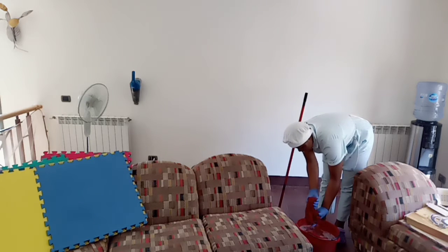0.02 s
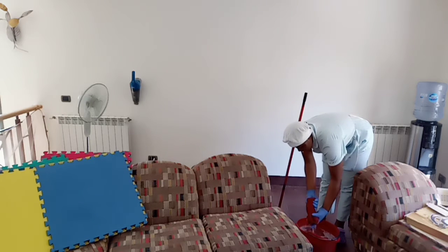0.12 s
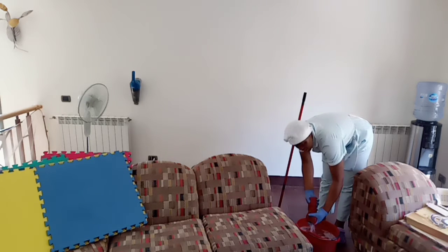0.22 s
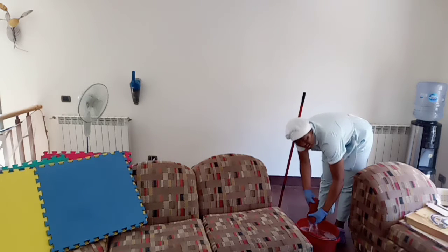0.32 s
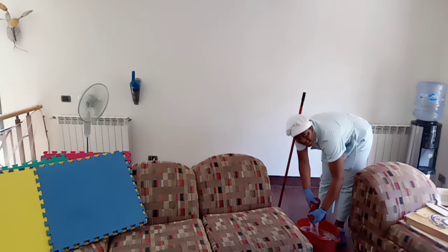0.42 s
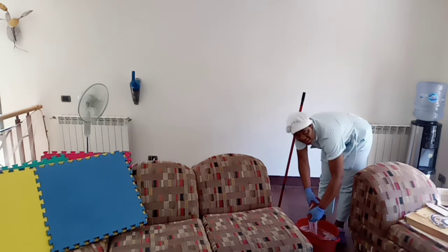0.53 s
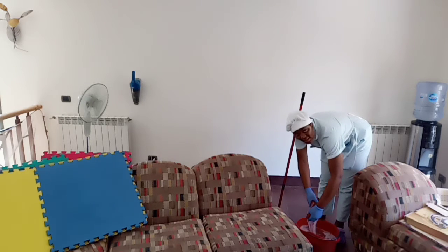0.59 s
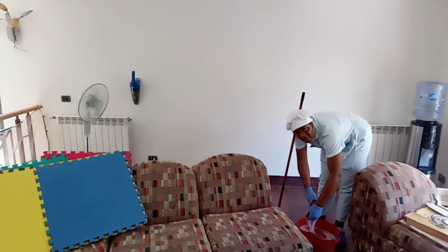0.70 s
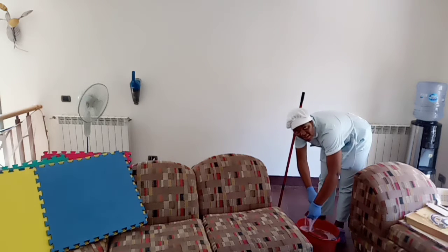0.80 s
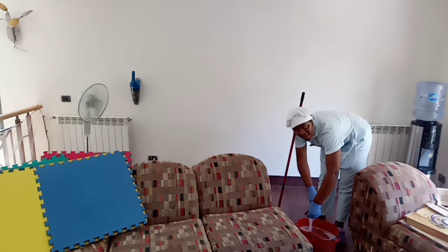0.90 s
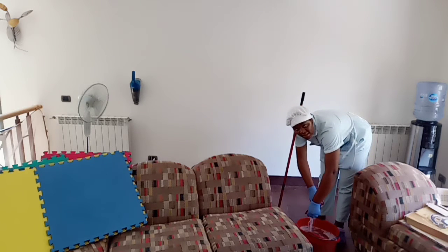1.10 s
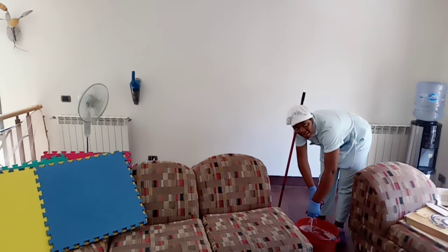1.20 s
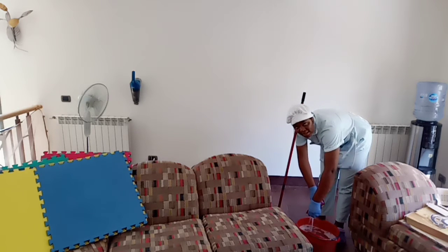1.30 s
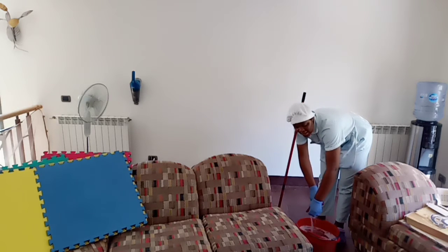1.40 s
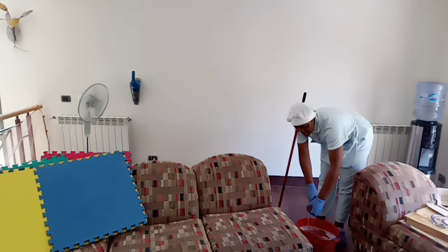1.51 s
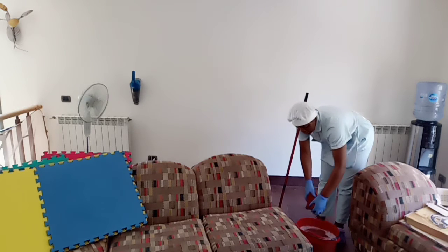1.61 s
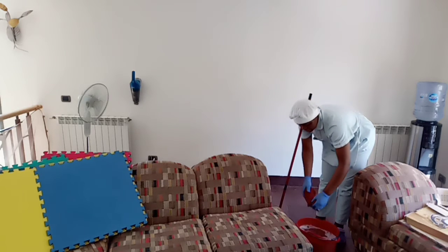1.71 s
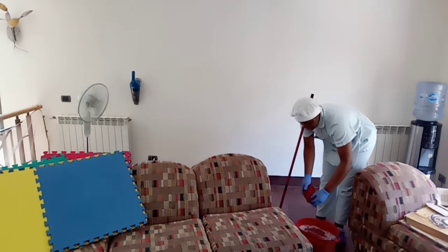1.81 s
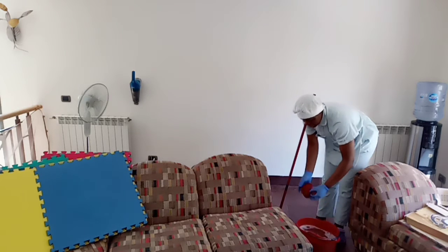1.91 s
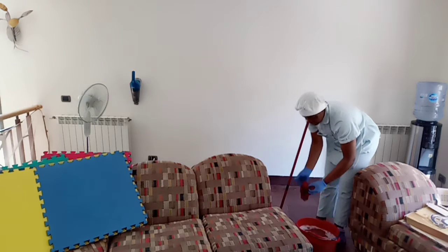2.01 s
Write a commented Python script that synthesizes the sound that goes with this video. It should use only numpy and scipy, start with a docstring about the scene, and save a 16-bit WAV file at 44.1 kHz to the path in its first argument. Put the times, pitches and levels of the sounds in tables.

```python
"""A quiet living room with a faint hum and a few small splats, then water trickles into a bucket.
A wet mop is wrung by hand over the plastic bucket, a few metres from the microphone. The trickle
swells and thins with the squeeze: crowds of tiny rings make drops, spray and squelch, larger rings
churn, and stirred air glugs and sounds hollow. Single bubbles plop as gliding sines; slops and
spits are bursts of filtered impacts. Random echoes give the room its short tail."""
import sys
import numpy as np
from scipy import signal
from scipy.io import wavfile
from scipy.ndimage import uniform_filter1d

SR = 44100
rng = np.random.default_rng(int(sys.argv[2]) if len(sys.argv) > 2 else 0)


def int16_out(signal):
    """Quantize to a 16-bit WAV file."""
    q = np.round(np.clip(np.atleast_2d(signal).T, -1, 1) * 32767)
    wavfile.write(sys.argv[1], SR, q.astype(np.int16))


N = 90405  # samples, about two seconds
T = np.arange(N) / SR


def amp(db):
    """Decibels to gain."""
    return 10 ** (np.asarray(db) / 20)


def evened(x):
    """Scales to unit rms."""
    return x / np.sqrt(np.mean(x ** 2) + 1e-20)


def curve(points):
    """Value over time, straight lines between (t/s, value) points."""
    return np.interp(T, *np.transpose(points))


def level(points):
    """Gain over time from (t/s, level/dB) points."""
    return amp(curve(points))


def read(points, hz):
    """Reads an (f/Hz, value) table on a log-frequency axis."""
    f, value = np.transpose(points)
    return np.interp(np.log(hz + 1), np.log(f + 1), value)


def add(mix, s, sound):
    """Mixes a sound in at a time in seconds, cut at the end of the mix."""
    part = mix[max(round(s * SR), 0):][:len(sound)]
    part += sound[:len(part)]


def colour(x, points, size=4096):
    """Causal minimum-phase filter with the given (f/Hz, level/dB) spectrum; unit rms out."""
    hz = abs(np.fft.fftfreq(size, 1 / SR))
    log_gain = np.log(amp(read(points, hz)))
    spectrum = np.exp(np.conj(signal.hilbert(log_gain)))
    taps = np.fft.ifft(spectrum).real[:size // 2]
    return evened(signal.fftconvolve(x, taps)[:len(x)])


def impacts(per_s, spread_db):
    """Random impacts of uneven size and either sign."""
    chance, size, sign = rng.random((3, N))
    strength = amp(spread_db * np.minimum(-np.log(size), 3.5))  # a few stand out, up to a ceiling
    return (chance < per_s / SR) * strength * np.sign(sign - .5)


def background():
    """Still air of the room as coloured noise, with a faint hum as one steady sine."""
    # Colour of the still air: f/Hz, level/dB
    air_colour = [(20, -36), (45, -11), (90, 3.5), (150, 1), (300, -6.5), (700, -14.5), (1500, -16),
                  (3000, -10), (5500, -33), (15000, -34)]
    air_db, hum_hz, hum_db = -65.5, 103, -77.5
    air = colour(rng.standard_normal(N), air_colour)
    hum = evened(np.sin(2 * np.pi * hum_hz * T))
    return amp(air_db) * air + amp(hum_db) * hum


def echoes(x, wet_db, early_db, size=20000):
    """Direct sound, close reflections and a tail that dies at its own speed in each band."""
    # Time for the tail to fall 60 dB: f/Hz, t/s
    tail_times = [(200, 0.27), (900, 0.32), (3000, 0.29), (8000, 0.14), (15000, 0.53)]
    taps = rng.choice([-1., 1.], size) * (rng.random(size) < .12)  # sparse echoes
    taps[:size // 100] = 0  # gap ahead of the tail
    hz, t, bands = signal.stft(taps, SR, nperseg=256)
    fall = amp(-60 * t / read(tail_times, hz)[:, None])
    tail = signal.istft(bands * fall, SR, nperseg=256)[1]
    response = amp(wet_db) * tail / np.linalg.norm(tail)
    early = rng.integers(40, 400, 8)  # delays in samples
    response[early] += amp(early_db) * rng.choice([-1., 1.], 8)
    response[0] += 1  # direct sound
    return signal.fftconvolve(x, response / np.linalg.norm(response))[:N]


def room(x, wet_db, early_db, count=6):
    """The water lands on a cycle of spots, each with its own path through the room."""
    spot_s = .04  # step from one spot to the next
    out = np.zeros(N)
    for k in range(count):
        away = (T / spot_s - k + 1) % count - 1  # steps from this spot's turn
        fade = np.cos(np.pi / 2 * np.minimum(abs(away), 1))
        out += echoes(x * fade, wet_db, early_db)
    return out


def stirred(hz, width_hz):
    """An air cavity kept ringing by a stream of small impacts; its pitch follows a curve."""
    turn = np.exp(2j * np.pi * np.cumsum(hz) / SR)
    smooth = signal.butter(2, width_hz / 2, fs=SR)
    swing = signal.lfilter(*smooth, impacts(per_s=500, spread_db=0) / turn)  # pitch shifted to zero
    return evened((turn * swing).real)


def fizz(low_hz, high_hz, per_s, cycles, spread_db, count=60):
    """A crowd of small bubbles, each a short rising ring with a soft start."""
    rise_per_cycle = 0.0097  # share of its pitch that a bubble gains as it surfaces
    out = np.zeros(N)
    for hz in np.geomspace(low_hz, high_hz, count):
        turns = hz * T[:SR // 16]
        age = turns / cycles
        swing = np.sin(2 * np.pi * turns * (1 + rise_per_cycle * turns / 2))
        ring = swing * age ** 2 * np.exp(-age ** 2 / 2)
        out += hz * signal.oaconvolve(impacts(per_s / count, spread_db), ring)[:N]
    return evened(out)


def hollow():
    """The bucket's hollow note: its air is stirred, its pitch moves with the mop in the mouth."""
    # Pitch of the note: t/s, f/Hz
    hollow_pitch = [(.45, 302), (.8, 331), (.96, 290)]
    # Strength of the note: t/s, level/dB
    hollow_level = [(.35, -73.5), (.45, -59.5), (.65, -72), (.8, -58), (.9, -69), (.96, -48.5),
                    (1.1, -56.5), (1.46, -62), (1.55, -76)]
    return stirred(curve(hollow_pitch), width_hz=65) * level(hollow_level)


def glug():
    """An air pocket under the stream glugs as a cavity of shifting pitch."""
    # Glugging of the pocket: t/s, f/Hz, level/dB
    glug_points = [(.3, 570, -76), (.55, 630, -57.5), (0.579, 630, -49), (.7, 555, -46.5),
                   (.76, 440, -52.5), (.81, 604, -47), (.9, 525, -61), (.94, 507, -51.5), (1.02, 515, -60),
                   (1.08, 530, -53), (1.4, 483, -71.5), (1.58, 506, -64), (1.65, 480, -54), (1.8, 477, -87)]
    s, hz, db = np.transpose(glug_points)
    return stirred(np.interp(T, s, hz), width_hz=150) * amp(np.interp(T, s, db))


def churn():
    """Larger bubbles ring in a crowd where the stream digs into the water."""
    # Strength of the churning: t/s, level/dB
    churn_level = [(0, -78), (.19, -61.5), (.26, -63.5), (.34, -54.5), (.5, -60), (.62, -52), (.75, -56.5),
                   (1, -48.5), (1.25, -51.5), (1.38, -63.5), (1.44, -58), (1.48, -65.5), (1.82, -67)]
    # Colour of the churning: f/Hz, level/dB
    churn_colour = [(250, -14.5), (380, -14), (500, 0.5), (620, 0.5), (730, -3.5), (860, 3.5), (1080, -1),
                    (1400, -5.5)]
    bubbles = fizz(392.4, 1360, per_s=1800, cycles=2.95, spread_db=1.5)
    return colour(bubbles, churn_colour) * level(churn_level)


def gurgle():
    """Churning bubbles, the glugging air pocket and the stirred air of the bucket."""
    return churn() + glug() + hollow()


def clump(db, hz, octaves, rise, decay):
    """A brief clump of impacts around one pitch, with a straight rise and exponential decay."""
    t = T[:SR // 5]
    # Steps of the given width from the centre, and dB below it
    skirts = ((-8, 60), (-4, 30), (-2, 16), (-1, 4), (0, 0), (1, 4), (2, 20), (4, 32), (8, 55))
    band = [(hz * 2 ** (k * octaves), -skirt) for k, skirt in skirts]
    burst = colour(impacts(per_s=6000, spread_db=1.5)[:len(t)], band)
    shape = np.minimum(t / rise, 1) * np.exp(-np.maximum(t - rise, 0) / decay)
    return amp(db) * burst * shape


def splashes():
    """Slops of water landing and bright spits of spray, each a clump of impacts."""
    # Slops: t/s, level/dB, centre f/Hz, width/octaves, rise/s, decay/s
    slops = [(.007, -53.5, 3230, 0.13, 0.0024, 0.0046), (0.054, -49, 3700, 0.35, 0.0037, 0.028),
             (.085, -49, 3420, 0.23, 0.0063, 0.015), (.355, -35, 3090, 0.17, 0.0054, 0.0079),
             (.814, -47, 980, 0.32, .009, 0.02), (0.9654, -36, 1030, 0.2, 0.00084, .015),
             (0.966, -36.5, 2830, 0.47, 0.0028, 0.019), (1.225, -36, 3400, 0.39, 0.011, 0.0069),
             (1.299, -34.5, 2590, 0.4, 0.0071, 0.013), (1.349, -40, 3240, 0.63, 0.0041, 0.012),
             (1.41, -46, 3380, 0.39, 0.0063, 0.022), (1.488, -48.5, 520, 0.56, 0.0035, 0.016),
             (1.609, -50, 3900, 0.15, 0.026, 0.056), (1.659, -49, 900, 0.17, 0.0083, 0.011),
             (1.711, -45.5, 920, 0.14, 0.0023, 0.018), (1.711, -41.5, 2530, 0.36, 0.0032, .011),
             (1.74, -46, 3800, 0.3, 0.013, 0.015), (1.862, -52, 2820, 0.75, 0.0046, 0.0056)]
    # Spits: t/s, centre f/Hz, level/dB
    spits = [(0.056, 8600, -53.5), (0.336, 9700, -46.5), (.70, 9800, -46), (0.784, 8400, -42.5),
             (0.928, 9600, -46.5), (0.967, 8900, -41.5), (1.047, 8700, -41.5), (1.07, 9450, -40),
             (1.109, 5200, -41), (1.213, 4700, -38), (1.419, 10400, -53), (1.729, 10400, -57)]
    out = np.zeros(N)
    for s, *slop in slops:
        add(out, s, clump(*slop))
    for s, hz, db in spits:
        add(out, s, clump(db, hz, octaves=.22, rise=.003, decay=.003))
    return out


def plops():
    """Each single bubble, large or small, swells as it pinches off, then rings out, wobbling
    in the stirred water."""
    # Single ringing bubbles: t/s, starting f/Hz, level/dB, swell/s, decay/s
    bubbles = [(.172, 524, -49.5, 0.016, 0.022), (.333, 1002, -39.5, 0.0015, 0.0043),
               (.634, 514, -39.5, .003, 0.011), (.6355, 3445, -17.5, 0.0017, 0.0021),
               (.819, 862, -27, .01, 0.0095), (.939, 3700, -32.5, .00084, 0.013),
               (.967, 1007, -28, 0.00081, 0.0062), (1.035, 2314, -26, 0.0023, 0.0012),
               (1.04, 3160, -25.5, 0.0024, .0015), (1.228, 2040, -38.5, 0.011, 0.013),
               (1.297, 2075, -37.5, .013, 0.031), (1.488, 550, -41, 0.0057, 0.0073),
               (1.659, 482.6, -42, 0.0124, 0.017), (1.661, 822, -36, 0.011, 0.0017),
               (1.7505, 3520, -29.5, 0.00098, 0.0009), (1.859, 1535, -50, 0.0074, 0.0032)]
    rise_per_s, wobble_share = 0.36, 0.034  # both as a share of the pitch
    out, t = np.zeros(N), T[:SR // 5]
    for s, hz, db, swell, decay in bubbles:
        onset = np.sin(np.pi / 2 * np.minimum(t / swell, 1)) ** 2
        shape = onset * np.exp(-np.maximum(t - swell, 0) / decay)
        wobble = evened(uniform_filter1d(rng.standard_normal(len(t)), size=200))
        pitch = hz * (1 + rise_per_s * t + wobble_share * wobble)
        turns = np.cumsum(pitch) / SR
        add(out, s, amp(db) * shape * np.sin(2 * np.pi * turns))
    return out


def drops():
    """Drops patter on the water and their tiny trapped bubbles ring."""
    # How hard the water runs: t/s, level/dB
    flow = [(0, -62.5), (.15, -61), (.19, -51), (.25, -56), (.31, -50), (.36, -46.5), (.48, -47.5),
            (.57, -40.5), (1.07, -41.5), (1.2, -42.5), (1.28, -50.5), (1.35, -41.5), (1.45, -50.5),
            (1.57, -54.5), (1.66, -51), (1.8, -55.5), (1.92, -66.5)]
    # Colour of the drops: f/Hz, level/dB
    drop_colour = [(1100, -11), (1600, -13.5), (2050, -11), (2500, 0.5), (2900, -4), (3400, -0.5),
                   (4100, -5), (4800, -16.5), (6000, 16), (9000, -51.5)]
    patter = fizz(1548, 4628, per_s=3200, cycles=3.83, spread_db=3.1)
    return colour(patter, drop_colour) * level(flow)


def spray():
    """Fine, sparkling spray of uneven strength: a dense crowd of the smallest, highest rings."""
    # Strength of the fine spray: t/s, level/dB
    spray_level = [(0, -64), (.15, -74.5), (.3, -63.5), (.35, -58.5), (.45, -59), (.57, -51.5), (1.06, -51),
                   (1.25, -53.5), (1.45, -59), (1.6, -57.5), (1.74, -62), (1.8, -68), (2.05, -75.5)]
    # Colour of the spray: f/Hz, level/dB
    spray_colour = [(2500, 16.5), (4800, -4.5), (6000, -1.5), (7600, -2), (9300, 3.5), (10500, -3.5),
                    (12000, -8), (15500, -16.5)]
    mist = fizz(3720, 15850, per_s=5500, cycles=4.5, spread_db=3.4)
    return colour(mist, spray_colour) * level(spray_level)


def squelch():
    """Water leaves the strands with a dull squelch: lower rings of very few cycles."""
    # Strength of the squelch: t/s, level/dB
    squelch_level = [(0, -69.5), (.15, -68), (.19, -51), (.27, -54), (.34, -51), (.64, -48), (.9, -47),
                     (1.1, -54.5), (1.34, -56.5), (1.42, -64.5), (2.05, -75)]
    # Colour of the squelch: f/Hz, level/dB
    squelch_colour = [(600, -19), (1100, -7), (1600, -1.5), (2100, 1.5), (2800, 0)]
    strands = fizz(681, 2800, per_s=2600, cycles=1.97, spread_db=2.5)
    return colour(strands, squelch_colour) * level(squelch_level)


def trickle():
    """Drops and their tiny bubbles, between a dull squelch and a fine, sparkling spray."""
    return drops() + spray() + squelch()


def scene():
    """All the water sounds in the room, over its still air and hum, on one channel."""
    running = room(trickle() + gurgle() + plops(), wet_db=-2.0, early_db=-11)
    landing = room(splashes(), wet_db=-4, early_db=-14.5)
    return (running + landing + background())[None]


def record(dry):
    """The recorder's band limit: a steep low-pass without delay."""
    edge_hz = 15750
    taps = signal.firwin(511, edge_hz, window=("kaiser", 9), fs=SR)
    return signal.oaconvolve(dry, taps[None], "same")


dry = scene()
out = record(dry)
int16_out(out)
```